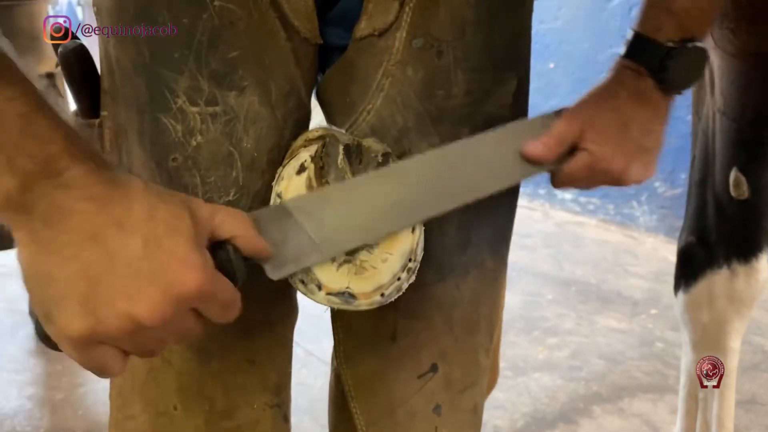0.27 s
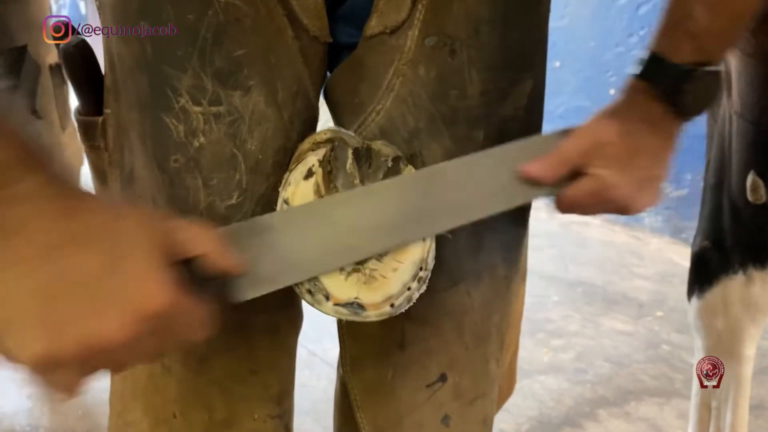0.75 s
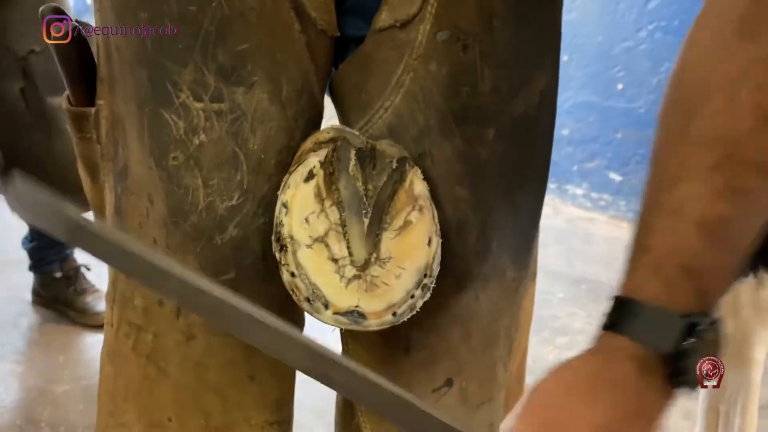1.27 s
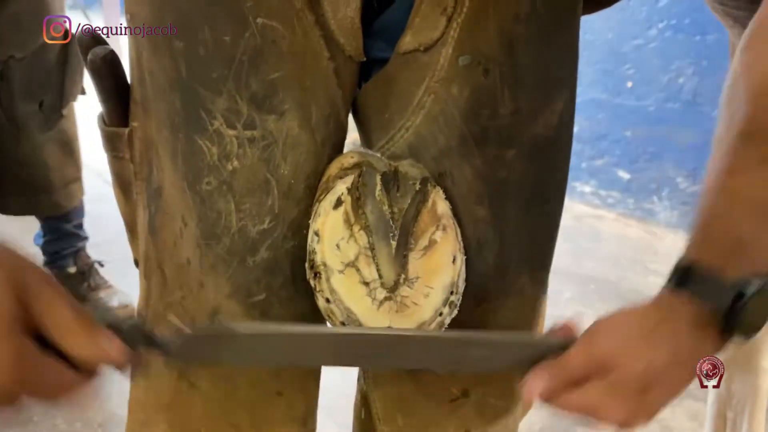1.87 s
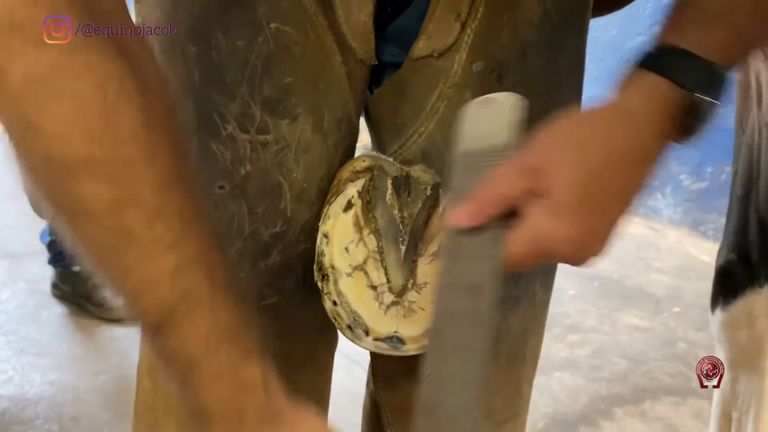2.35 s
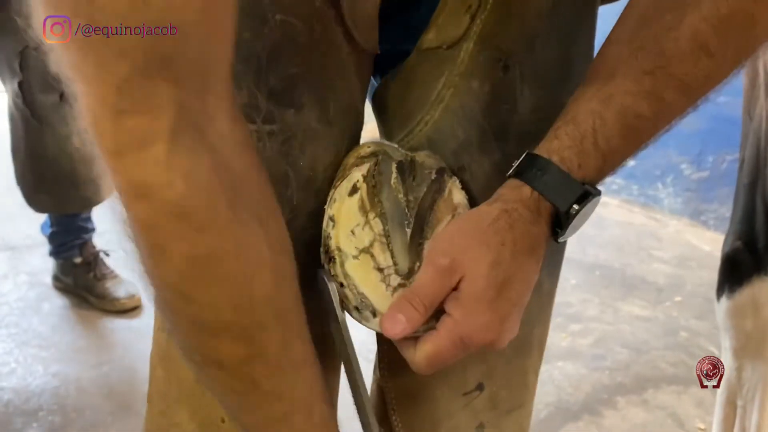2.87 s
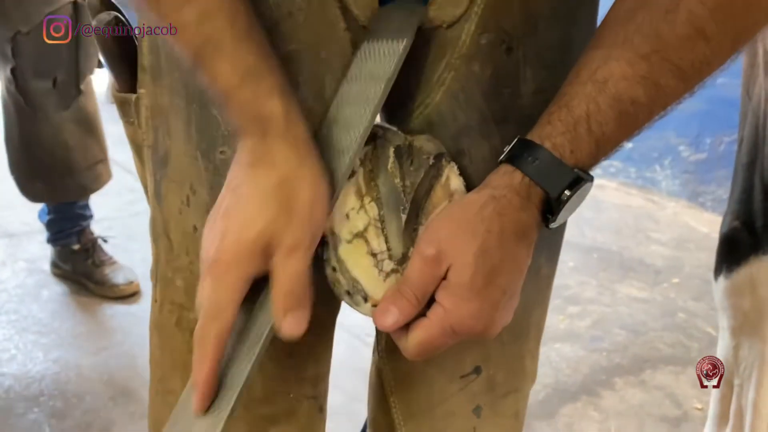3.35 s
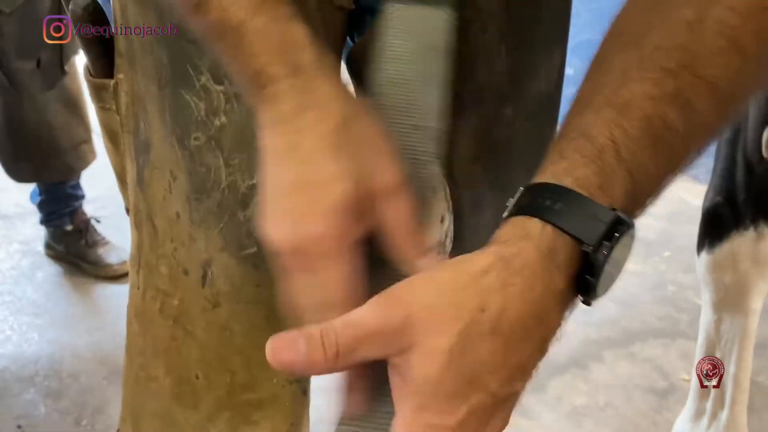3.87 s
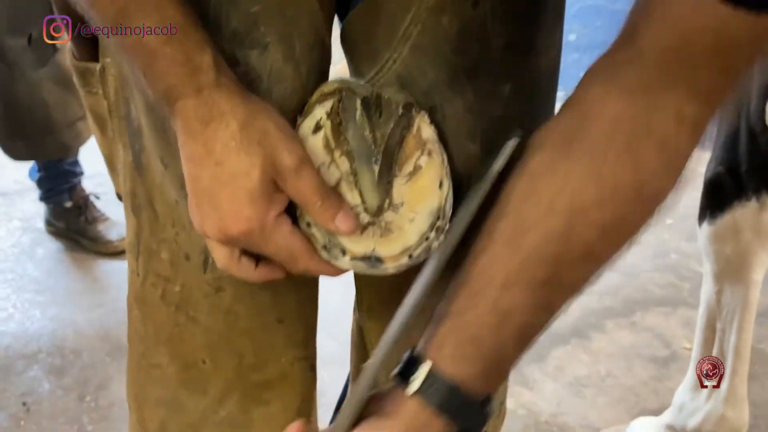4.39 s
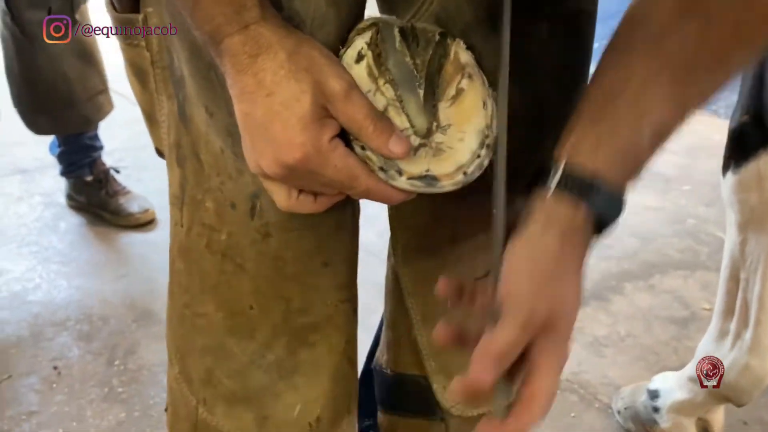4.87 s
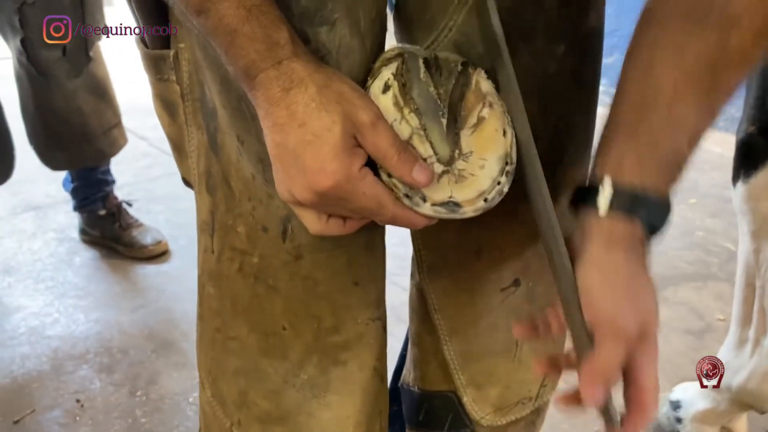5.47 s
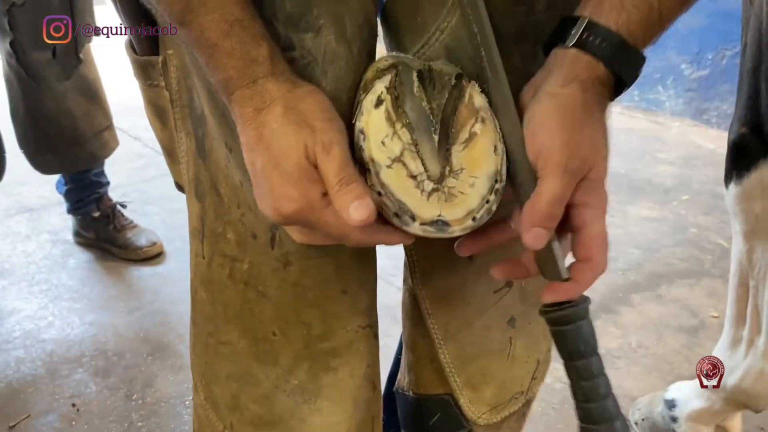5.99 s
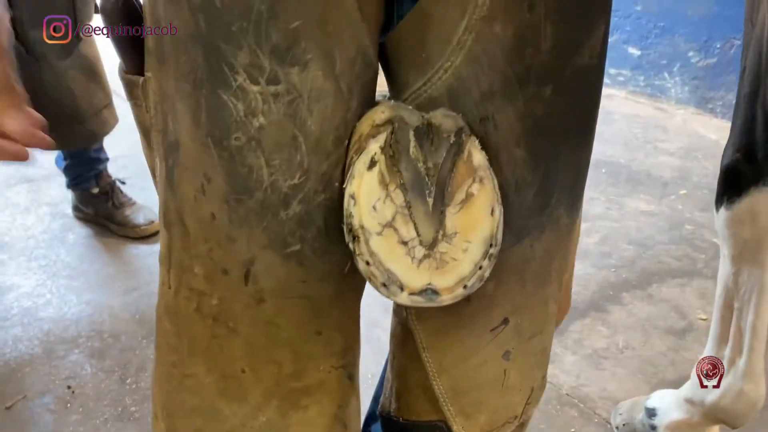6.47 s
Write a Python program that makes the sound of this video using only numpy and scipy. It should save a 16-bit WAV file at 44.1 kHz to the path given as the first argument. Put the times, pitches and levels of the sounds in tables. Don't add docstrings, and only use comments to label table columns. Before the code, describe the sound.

In a hard-walled stable, heard close in stereo, a steel rasp strikes hoof horn at once with a gritty, ringing tick, and again at 0.25 s with a short firm drag. A softer touch at 0.5 and light scraping around 0.75-0.9 follow. A nearby motor revs near 0.2 and 0.85, then moves off by 1.6. A dull bite with a thud comes at 1.5; thin metallic sliding swells until 2.0. Crisp knocks follow at about 2.0, 2.25, 2.5 and 2.75. Faint long drags pass at 3.1-3.5, and a bright light ring at 3.7. From 4.4 to 5.6 brisk rasp strokes repeat every quarter second, with a low squeal near 5.0 and the strongest drag and thuds at 5.5-5.6. Small taps fade at 5.9-6.0; low dull knocks close at 6.6. Ventilation rumble and faint hiss persist, with short echoes.

```python
import sys
import numpy as np
from scipy import signal
from scipy.fft import rfft, irfft
from scipy.io import wavfile
from scipy.ndimage import uniform_filter1d

SR = 44100
rng = np.random.default_rng(int(sys.argv[2]) if len(sys.argv) > 2 else 0)


def persist_wave(psi):
    counts = np.round(np.clip(psi, -1, 1) * 32767).astype(np.int16)
    wavfile.write(sys.argv[1], SR, np.atleast_2d(counts).T)


def boost_factor(decibels):
    exponent = np.asarray(decibels, float) / 20
    return 10 ** exponent


N = 296908


def evened(x):
    return x / np.sqrt(np.mean(x ** 2) + 1e-20)


def read(points, hz):
    f, value = np.transpose(points)
    return np.interp(np.log(abs(hz) + 1), np.log(f + 1), value)


def add(mix, s, sound):
    part = mix[..., round(s * SR):][..., :sound.shape[-1]]
    part += sound[..., :part.shape[-1]]


def from_start(s, sound):
    return max(s, 0), sound[max(round(-s * SR), 0):]


def flicker(size, per_s, depth_db):
    steps = rng.standard_normal(int(size / SR * 200) + 3)
    return boost_factor(depth_db * np.interp(np.arange(size) / SR * per_s, np.arange(len(steps)), steps))


def grit(size, spread_db=3.3):
    unevenness = np.minimum(rng.exponential(1, size), 5)
    return evened(rng.standard_normal(size) * boost_factor(spread_db * unevenness))


def resonate(x, hz, width):
    turn = np.exp(2j * np.pi * np.cumsum(hz * np.ones(len(x))) / SR)
    r = np.exp(-np.pi * width / SR)
    return 2 * (turn * signal.lfilter([1 - r], [1, -r], x / turn)).real


# f/Hz, width/Hz, level/dB
BLADE_MODES = [(1750, 61, 4), (2380, 40, -22.5), (2740, 240, -8), (3120, 250, 1), (3840, 180, 0),
               (4350, 110, -7), (4930, 100, -8), (5600, 120, -4), (5900, 230, 9), (6260, 270, 8),
               (7300, 27, -6), (7800, 140, 6), (9000, 130, 6), (9380, 340, 16), (10900, 600, 5.5),
               (12200, 120, 2), (12450, 250, 16), (13300, 570, 13)]
# f/Hz, level/dB
GRIT_COLOUR = [(600, -29), (1300, -9.5), (1900, -3.5), (2500, -0.5), (6000, -5.5), (11000, -4),
               (13000, -11.5), (15500, -19.5)]


def steel(drive, dull_db, bright_db, ring=.4):
    weights = boost_factor(1.5 * rng.standard_normal(len(BLADE_MODES)))
    modes = sum(g * boost_factor(db) * resonate(drive, hz, w) for g, (hz, w, db) in zip(weights, BLADE_MODES))
    mixed = drive + ring * modes * np.sqrt(np.mean(drive ** 2) / np.mean(modes ** 2))
    hz = np.fft.rfftfreq(len(drive), 1 / SR)
    fine_share, fine_t60 = .3, .04
    crowd = rng.standard_normal(4000) * boost_factor(-60 * np.arange(4000) / SR / fine_t60)
    fine = rfft(crowd / np.linalg.norm(crowd), len(drive))
    crowded = (1 - fine_share + fine_share * fine) / np.hypot(fine_share, 1 - fine_share)
    z = rfft(mixed) * boost_factor(read(GRIT_COLOUR, hz)) * crowded
    dull = 1 / (1 + (hz / 4000) ** 8)
    middle = 1 / (1 + (hz / 8000) ** 8) - dull
    parts = [irfft(z * share, len(drive)) for share in (dull, middle, 1 - dull - middle)]
    return boost_factor(dull_db) * parts[0] + parts[1] + boost_factor(bright_db) * parts[2]


# t/s, peak level/dB, dull level/dB, bright level/dB, contact t60/s
KNOCKS = [(0.0074, -19, -6, -6, 0.28), (0.252, -22, -2.5, -2, 0.33), (0.533, -41, -6, -25, 0.7),
          (1.463, -28, -11, -7, 0.31), (1.9863, -37, -3, 2, 0.6), (2.2329, -30.5, -5.5, -0.5, 0.29),
          (2.4811, -37, 2.5, 1.5, 0.42), (2.726, -28, 0, -1, 0.31), (3.2275, -49, 8, 5, 0.23),
          (3.6995, -43, -21, 8, 0.21), (4.3676, -27, -8, -10, 0.27), (4.6203, -29.5, -2, -3.5, 0.33),
          (4.8685, -22, -1, -5.5, 0.19), (5.1103, -29.5, 0.5, 0, 0.3), (5.343, -23.5, 0, -3.5, 0.35),
          (5.516, -40, 4, 4, .3), (5.5842, -26, 3, -1, 0.28), (5.907, -39.5, -2, -12, 0.2),
          (.191, -44, 2, -4, .3), (.7423, -54, -1, 2, .2), (3.0798, -51, 0, -3, .2),
          (3.2589, -47, -2, 3, .15), (6.012, -46, -1, -2, 0.23)]


def knock(s, db, dull_db, bright_db, t60):
    t = np.arange(-2600, 13000) / SR
    brush = 0.17 * np.exp(np.minimum(t, 0) / 0.023) * (t < 0)
    tick = 1.19 * np.exp(-abs(t) / 0.003)
    chatter = 0.44 * (1 - np.exp(-abs(t) / 0.002)) * flicker(len(t), 190, 2.5) * boost_factor(-60 * t / t60)
    force = brush + (t >= 0) * (tick + chatter)
    return from_start(s + t[0], boost_factor(db + 2.5) * steel(force * grit(len(t)), dull_db, bright_db))


# start t/s, push/s, pressure level/dB, dull level/dB, bright level/dB
STROKES = [
    (.25, 0.051, -33.5, 4, 1.5),
    (.75, .12, -46.5, 5, 2.5),
    (1.462, 0.023, -32.5, 1, -8),
    (3.06, 0.12, -50.5, -4, -4),
    (3.23, 0.24, -51.5, 1, 1.5),
    (4.875, 0.16, -47.5, 0, 1.5),
    (5.515, .13, -33, 5.5, -0.5),
    (6.583, .04, -54, 5, -14),
    (.205, .045, -45, 0, 2),
    (.265, .03, -42, -6, 7),
]


def stroke(s, push, db, dull_db, bright_db):
    t = np.arange(20000) / SR
    dig_share, lift_db_per_s, ringing = 0.28, 296, 0.45
    lift = boost_factor(db - lift_db_per_s * np.maximum(t - push, 0))
    pressure = np.minimum(t / (dig_share * push), 1) * lift
    sound = steel(grit(len(t)) * flicker(len(t), 170, 3.2), dull_db, bright_db, ringing)
    return s, pressure * sound / np.hypot(1, ringing)


def patchy(x, depth_db=2):
    z = signal.stft(x, nperseg=256, noverlap=192)[2]
    field = rng.standard_normal(z.shape[::-1]).T
    field = uniform_filter1d(field, size=2, axis=0)
    field = evened(uniform_filter1d(field, size=20, axis=1))
    return signal.istft(z * boost_factor(depth_db * field), nperseg=256, noverlap=192)[1][:N]


def ring(s, length, hz, width, db, t60, swell=0.048, stutter=1, blow=0):
    t = np.arange(-.03, length + .8 * t60, 1 / SR)[:24000]
    drive = grit(24000, spread_db=4.5)[:len(t)]
    pitch = hz * flicker(24000, 35, .05)[:len(t)]
    flutter = flicker(24000, 110, 4.5)[:len(t)]
    tone = evened(resonate(resonate(drive, pitch, 2 * width), pitch, 2 * width))
    tone = tone + blow * (t >= 0) * np.exp(-abs(t) / .006) * np.sin(2 * np.pi * hz * t)
    rise = np.where(t < 0, 0.21 * np.exp(t / 0.016), np.minimum(0.29 + t / (swell * length), 1))
    flutter = flutter ** (stutter * np.clip(t / 0.045, 0, 1))
    decay = boost_factor(db - 60 * np.maximum(t - length, 0) / t60)
    return from_start(s + t[0], tone * rise * flutter * decay)


# t/s, f/Hz, width/Hz, level/dB
STRUCK = [(.011, 2610, 200, -39.5), (.24, 8000, 300, -43), (.53, 2650, 130, -50), (.657, 9520, 100, -57),
          (1.462, 8600, 300, -47), (1.457, 11000, 500, -52), (1.475, 5300, 330, -48),
          (1.999, 2250, 220, -49.5), (2.24, 3780, 150, -48), (2.236, 2600, 200, -47.5),
          (2.5, 4160, 400, -52), (2.726, 2540, 200, -38.5), (2.725, 3440, 190, -45), (2.73, 6360, 250, -45),
          (3.701, 4404, 68, -51), (3.701, 5900, 160, -46), (3.703, 7700, 220, -46.5),
          (3.7, 8930, 100, -42.5), (3.701, 9700, 100, -44.5), (3.7, 10900, 368, -42),
          (5.112, 7300, 500, -43.5), (5.52, 8800, 462, -39), (0.012, 3550, 120, -44),
          (.007, 6050, 300, -46), (0.0071, 7800, 200, -53), (2.234, 8750, 150, -48.5),
          (2.234, 7900, 250, -50), (2.234, 5800, 120, -54), (2.73, 8600, 150, -53),
          (3.705, 11150, 400, -46.5), (5.113, 11700, 400, -46), (4.87, 10000, 300, -52),
          (4.368, 2890, 230, -53), (4.368, 6500, 200, -54), (4.621, 3430, 150, -51),
          (4.621, 4580, 150, -48), (4.621, 5860, 150, -49), (4.621, 7850, 150, -53),
          (4.621, 10800, 250, -45), (4.869, 3020, 150, -44.5), (4.869, 8000, 200, -46),
          (4.869, 11900, 400, -46.5), (5.112, 3850, 120, -51), (5.112, 2900, 150, -50),
          (5.112, 5900, 150, -52), (5.344, 2700, 200, -50), (5.344, 3600, 350, -45),
          (5.344, 5840, 400, -41.5), (5.344, 7940, 150, -47), (5.346, 8820, 280, -46)]


def struck(s, hz, width, db):
    return ring(s, 0.025, hz, width, db, t60=0.32, stutter=.55, blow=2.6)


# t/s, f/Hz, width/Hz, level/dB
TAPS = [(2.482, 13500, 1200, -46), (4.369, 11150, 300, -37.5), (4.617, 10560, 400, -37.5),
        (5.907, 5860, 200, -46.5), (6.012, 2330, 350, -40), (6.595, 1120, 80, -41.5),
        (6.585, 1790, 130, -45), (.252, 1560, 80, -46), (6.596, 4500, 250, -60), (6.602, 3730, 120, -57),
        (6.613, 2800, 200, -52), (6.617, 1990, 100, -44.5), (6.626, 1730, 100, -47),
        (6.634, 3300, 250, -57), (6.638, 4300, 200, -61), (6.66, 2100, 200, -49), (3.226, 12200, 300, -57),
        (3.228, 10400, 300, -56), (3.258, 7800, 300, -56), (3.325, 11900, 300, -60),
        (3.487, 12000, 500, -59), (6.026, 5900, 250, -53), (5.908, 2800, 250, -55), (.191, 9000, 150, -56),
        (.207, 4300, 120, -57), (.272, 8700, 300, -36), (.847, 7100, 150, -52), (.869, 5300, 300, -58),
        (.814, 3900, 250, -49), (4.369, 13800, 600, -56), (5.112, 13900, 500, -52), (4.621, 1800, 200, -47),
        (5.344, 1800, 200, -45), (5.346, 1370, 100, -48), (2.726, 13500, 1500, -47),
        (2.234, 14200, 600, -52), (2.482, 1900, 200, -52), (5.112, 2100, 300, -50),
        (5.344, 12500, 900, -45), (5.586, 5300, 300, -47), (5.585, 3040, 300, -45),
        (2.727, 11300, 400, -48), (2.484, 10800, 400, -52), (4.869, 1600, 200, -52)]


def tap(s, hz, width, db):
    return ring(s, 0.008, hz, width, db, t60=0.097, blow=2.2)


# t/s, length/s, f/Hz, level/dB
RUBBED = [(0.191, .15, 9000, -54), (.19, .06, 2580, -49.5), (.252, 0.051, 2350, -39),
          (.768, 0.032, 2680, -41), (.775, 0.096, 2230, -45), (.86, 0.048, 3200, -47.5),
          (0.734, .035, 2600, -51), (.862, 0.032, 2550, -44), (5.515, 0.044, 1560, -49),
          (5.52, 0.11, 4370, -45), (1.169, 0.062, 653, -52.5), (3.07, 0.09, 4600, -60),
          (3.215, 0.055, 1580, -57), (3.332, .046, 1950, -57), (4.878, 0.19, 4140, -52),
          (4.885, 0.08, 2830, -48.5), (5.512, 0.086, 1950, -39.5), (5.67, 0.086, 2900, -47),
          (5.658, 0.11, 4460, -51.5), (5.996, 0.048, 5800, -56), (6.03, 0.1, 2160, -55.5),
          (3.076, 0.064, 5250, -61), (3.13, .07, 3000, -59), (3.328, 0.065, 5200, -63),
          (3.43, 0.057, 7800, -56), (1.99, .05, 3900, -58), (2.031, 0.036, 3100, -59),
          (.81, 0.035, 2500, -39.5), (.815, 0.039, 3030, -42), (6.582, .045, 450, -36),
          (6.645, .03, 548, -43.5), (5.59, .085, 2890, -42.5), (5.53, .1, 3700, -44),
          (5.62, .06, 1660, -46), (2.25, .1, 3800, -55), (2.25, .08, 2600, -55), (2.74, 0.078, 3470, -49),
          (5.75, .07, 3320, -56), (.533, .12, 5300, -61)]


def rubbed(s, length, hz, db):
    return ring(s, length, hz, hz / 15, db, t60=0.18, stutter=.55)


# t/s, length/s, f/Hz, level/dB
SQUEALS = [
    (1.195, .1, 5650, -54),
    (1.88, .09, 4660, -61),
    (4.79, .32, 1555, -57),
    (4.94, .05, 1560, -46),
    (5.01, .018, 1563, -52),
]


def squeal(s, length, hz, db):
    return ring(s, length, hz, hz / 110, db, t60=.05, swell=.35, stutter=.4)


# t/s, length/s, f/Hz, level/dB
SLID = [(.755, 0.11, 8800, -51.5), (.78, 0.1, 9450, -57), (.75, .1, 7650, -58), (.8, 0.071, 7100, -55),
        (.81, 0.071, 6500, -56), (.8, 0.046, 4900, -58), (.78, 0.09, 3900, -53.5), (.89, 0.038, 5950, -59),
        (1.12, .15, 9200, -67), (1.76, .1, 8650, -51.5), (1.79, .18, 9050, -60), (1.75, 0.35, 11800, -58),
        (1.87, 0.063, 9630, -46.5), (1.9, .06, 5500, -64), (1.93, .1, 10600, -57), (1.95, 0.164, 8680, -48),
        (1.97, 0.1, 14290, -62), (1.98, .1, 12400, -53), (2.03, .07, 6500, -55.5), (2.04, 0.2, 5850, -61),
        (3.075, 0.044, 9200, -60), (3.28, 0.23, 8850, -57.5), (3.27, .14, 7600, -60),
        (3.24, .1, 11800, -63), (3.42, 0.09, 15400, -66), (3.2, .07, 15500, -65), (3.3, .13, 9500, -61),
        (5.93, .05, 6000, -64), (.83, 0.046, 5350, -58), (.86, .03, 11200, -60), (1.85, .1, 11200, -67),
        (1.78, 0.054, 10600, -63)]


def slid(s, length, hz, db):
    return ring(s, length, hz, hz / 97, db, t60=0.13, swell=.35, stutter=1.1)


# t/s, peak level/dB, f/Hz, t60/s
THUDS = [
    (.25, -49, 883, 0.14),
    (1.468, -44.5, 840, 0.32),
    (5.0, -55, 850, .2),
    (5.6, -39.5, 1300, 0.1),
    (5.612, -45, 800, 0.073),
    (5.635, -46, 1110, 0.069),
    (.86, -56, 950, 0.13),
    (6.59, -52, 2000, 0.3),
    (6.586, -47, 480, .2),
]


def thud(s, db, hz, t60):
    return ring(s, 0.04, hz, 0.34 * hz, db, t60, stutter=0.5)


# f/Hz, t60/s
STABLE_T60 = [(500, 0.55), (2000, 0.32), (5000, 0.4), (10000, 0.2), (16000, 0.51)]


def stable(x, short=1):
    taps = np.zeros((2, SR))
    at = np.arange(260, SR - 20, 20) + rng.integers(0, 20, (2, (SR - 261) // 20))
    np.put_along_axis(taps, at, rng.choice([-1., 1.], at.shape), 1)
    hz, t, z = signal.stft(taps, SR, nperseg=256)
    wet_db = read([(1000, 0.1), (5000, 0), (9000, -1)], hz)[:, None]
    decay_db = -60 * t / (short * read(STABLE_T60, hz)[:, None])
    tail = signal.istft(z * boost_factor(decay_db + wet_db), SR, nperseg=256)[1]
    return signal.fftconvolve(x[None], tail / np.linalg.norm(tail[0]), axes=1)[:, :N]


# f/Hz, level/dB per Hz
AIR = [(20, -38), (45, -33), (62, -11.5), (75, 3), (88, -7), (140, -1.5), (200, -0.5), (255, -5.5),
       (459, -25.5), (574, -29.5), (1710, -36.5), (6000, -51), (10500, -50.5), (16000, -63)]
# f/Hz, width/Hz, level/dB
DUCTS = [
    (146.4, 19, -0.5),
    (193.7, 11, -4.5),
    (237, 16, -3.5),
]
# f/Hz, likeness/1
SAME = [(60, 0.97), (150, 0.98), (380, 0.79), (600, 0.075), (1400, 0.17), (2800, 0.21), (16000, 0.16)]
# t/s, rumble level/dB
RUMBLE = [
    (0, -28.5),
    (1.2, -30.5),
    (1.5, -26.5),
    (1.62, -28.5),
    (2.6, -29),
    (2.85, -27),
    (3.6, -28),
    (4.2, -25),
    (4.45, -28),
    (6.73, -27.5),
]
# t/s, level/dB
MOTOR = [
    (0, -29),
    (.06, -21),
    (.23, -14.5),
    (.3, -29),
    (.6, -29.5),
    (.85, -24.5),
    (1.0, -30),
    (1.3, -31),
    (1.6, -43.5),
    (6.73, -45.5),
]


def air():
    frames, hz = N // 512 + 5, np.fft.rfftfreq(2048, 1 / SR)
    t = np.arange(frames) * 512 / SR
    a, b, c, d, patches = rng.standard_normal((frames, 1025, 5)).T
    patches = evened(uniform_filter1d(uniform_filter1d(patches, 20, 0), 8, 1))
    ducts = sum(boost_factor(2 * db) / (1 + (2 * (hz - f) / w) ** 2) for f, w, db in DUCTS)
    rumble_band = 1 / (1 + (hz / 270) ** 8)
    motor_body = 1 / (1 + (hz / 440) ** 12)
    motor_whir = 0.17 / (1 + ((hz + 1) / 460) ** -12) / (1 + (hz / 1600) ** 4)
    motor_band = (motor_body + motor_whir) / (1 + ((hz + 1) / 325) ** -10)
    rumble_db = np.interp(t, *np.transpose(RUMBLE)) + 28.5
    motor_db = np.interp(t, *np.transpose(MOTOR)) + 41.46
    field_db = (read(AIR, hz) + 10 * np.log10(1 + 0.97 * ducts))[:, None] + 0.5 * patches
    field_db += np.outer(rumble_band, rumble_db) + np.outer(motor_band, motor_db)
    same = read(SAME, hz)[:, None]
    left = a + 1j * b
    right = same * left + np.sqrt(1 - same ** 2) * (c + 1j * d)
    z = np.array([left, right]) * boost_factor(field_db)
    return boost_factor(-26) * evened(signal.istft(z, nperseg=2048, noverlap=1536)[1][:, :N])


def scene():
    scraped, rung = np.zeros(N), np.zeros(N)
    for table, contact in ((KNOCKS, knock), (STROKES, stroke)):
        for row in table:
            add(scraped, *contact(*row))
    scraped, background = patchy(scraped), air()
    for table, mode in ((STRUCK, struck), (TAPS, tap), (RUBBED, rubbed), (SQUEALS, squeal), (SLID, slid), (THUDS, thud)):
        for row in table:
            add(rung, *mode(*row))
    echo = boost_factor(.5) * stable(scraped) + boost_factor(-1) * stable(rung, short=0.44)
    return boost_factor(-1.5) * (scraped + rung + echo) + background


# f/Hz, left-right level/dB
TILT = [(60, 0.5), (180, -1.75), (1400, -0.37), (2800, 2.5), (5000, 4.5), (7000, 4.5), (8200, -1.5),
        (16000, 0.5)]
# f/Hz, left lead/rad
LEAD = [(100, .02), (1400, 0), (2800, .6), (5000, .6), (7000, 0), (16000, 0)]


def microphone_pair(z, hz):
    half = (boost_factor(read(TILT, hz) / 2) * np.exp(.5j * read(LEAD, hz)))[:, None]
    return z[0] * half, z[1] / half


def power_db(z):
    return 10 * np.log10(uniform_filter1d((abs(z) ** 2).mean((0, 1)), size=4) + 1e-20)


def whims(frames, bands):
    return evened(uniform_filter1d(rng.standard_normal((frames, bands)), size=12, axis=0))


# low f/Hz, high f/Hz, threshold level/dB over usual
FOLDED = [(6900, 7200, -5), (7650, 8900, 9), (8900, 9550, 2), (9850, 10300, 6), (10300, 11150, -1),
          (11150, 12000, 11), (12000, 12900, 10), (12900, 13500, -1), (13500, 14300, 9), (14300, 14900, 3),
          (14900, 16000, 8)]


def fold_treble(left, right, hz):
    mid, side = (left + right) / 2, (left - right) / 2
    whim = whims(side.shape[1], len(FOLDED))
    for k, (low, high, need_db) in enumerate(FOLDED):
        band = (hz >= low) & (hz < high)
        side_db = power_db(side[None, band])
        side[band] *= side_db - np.median(side_db) + 2 * whim[:, k] > need_db
    return np.array([mid + side, mid - side])


# low f/Hz, high f/Hz, threshold level/dB over usual
DROPPED = [(8300, 8450, -3.5), (9720, 10330, 4.5), (10330, 10900, -6.5), (11900, 12250, 3),
           (12250, 13200, -3), (13200, 13700, 7), (13700, 14200, 4.5), (14200, 14700, 1),
           (14700, 15200, -3), (15200, 15500, -2.5), (15500, 15800, 1), (7200, 7400, -6),
           (11450, 11620, -4.5), (6400, 6550, -7)]


def drop_treble(z, hz):
    masker_db = power_db(z[:, (hz > 2000) & (hz < 9000)])
    masker_db = uniform_filter1d(masker_db, size=7, origin=3)
    whim = whims(z.shape[2], len(DROPPED))
    for k, (low, high, need_db) in enumerate(DROPPED):
        band = (hz >= low) & (hz < high)
        margin_db = power_db(z[:, band]) - 1.1 * masker_db
        z[:, band] *= margin_db - np.median(margin_db) + 3 * whim[:, k] > need_db
    z[:, hz > 15750] = 0
    return z


def band_limit(x):
    return signal.sosfilt(signal.butter(12, 16460, fs=SR, output="sos"), x)


def record(dry):
    hz, t, z = signal.stft(dry, SR, nperseg=1024, noverlap=768)
    left, right = microphone_pair(z, hz)
    z = drop_treble(fold_treble(left, right, hz), hz)
    mix = signal.istft(z, SR, nperseg=1024, noverlap=768)[1][:, :N]
    return band_limit(mix)


dry = scene()
out = record(dry)
persist_wave(out)
```